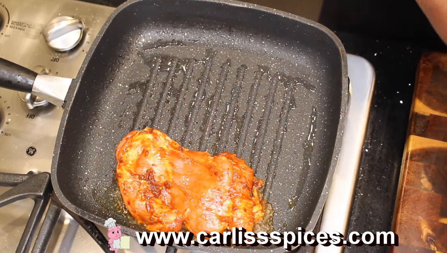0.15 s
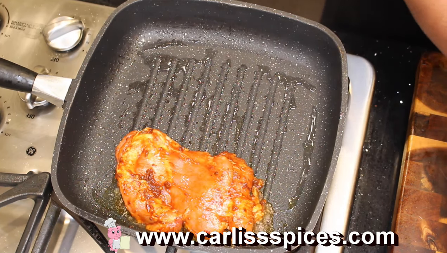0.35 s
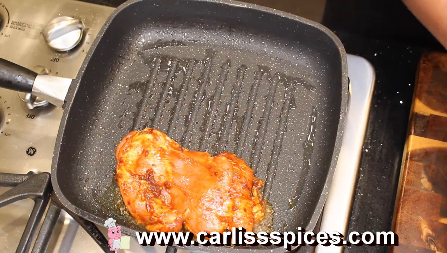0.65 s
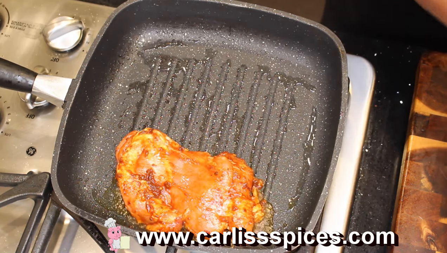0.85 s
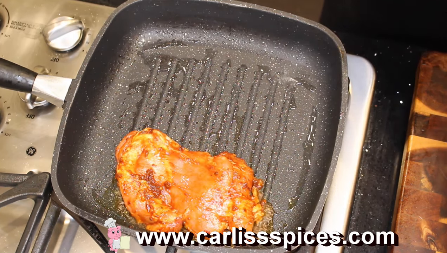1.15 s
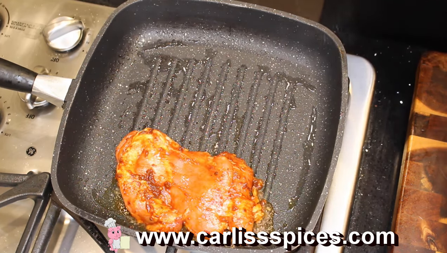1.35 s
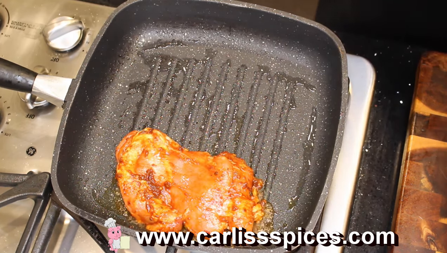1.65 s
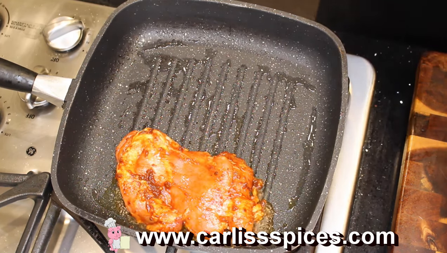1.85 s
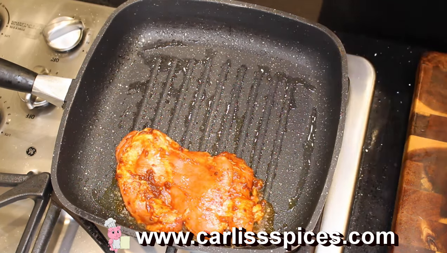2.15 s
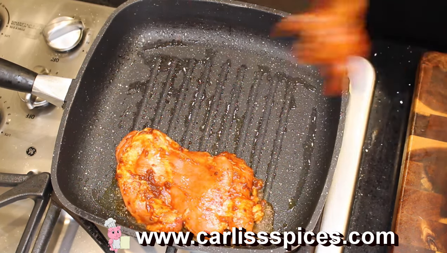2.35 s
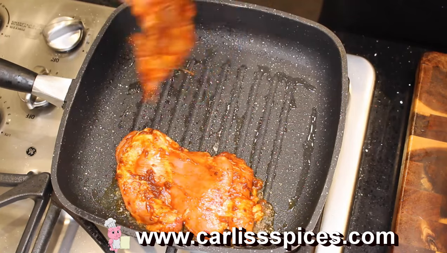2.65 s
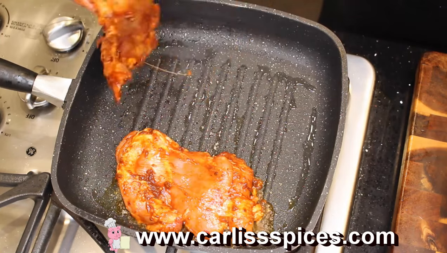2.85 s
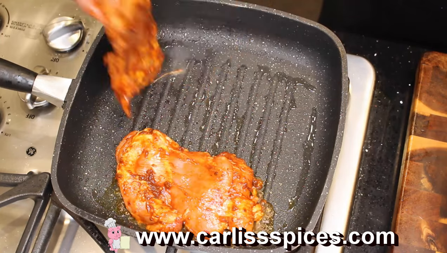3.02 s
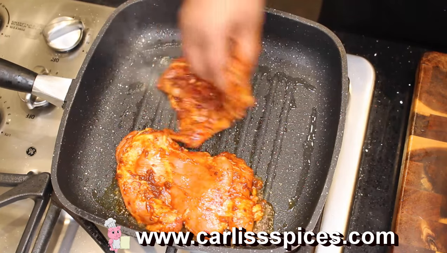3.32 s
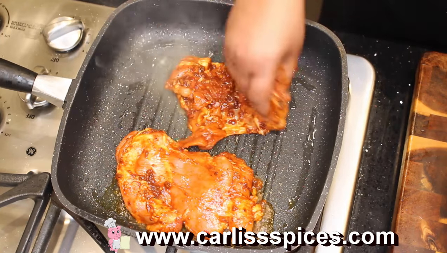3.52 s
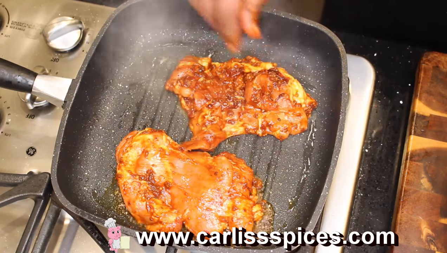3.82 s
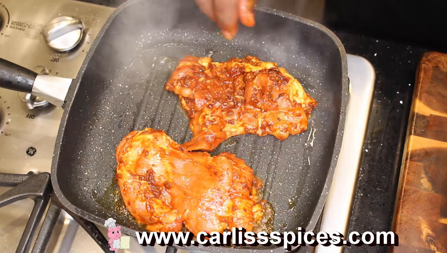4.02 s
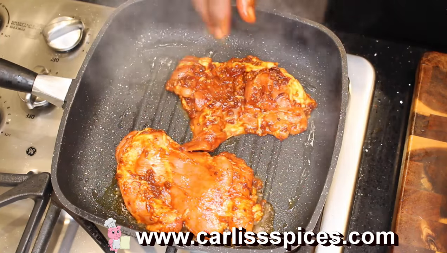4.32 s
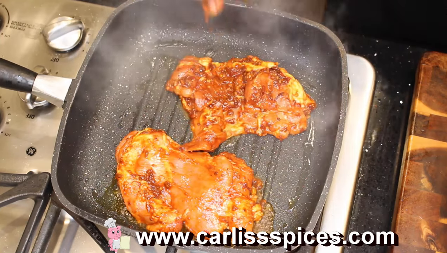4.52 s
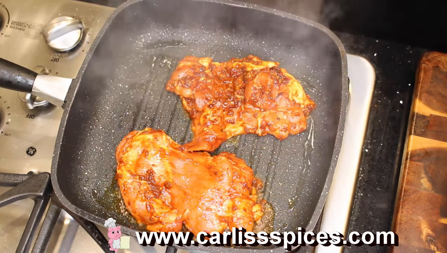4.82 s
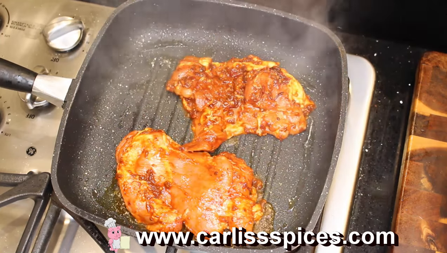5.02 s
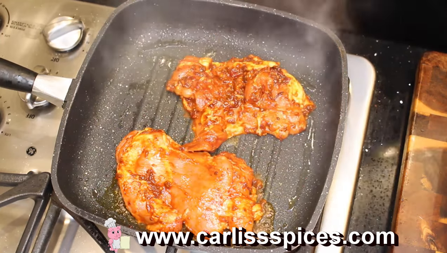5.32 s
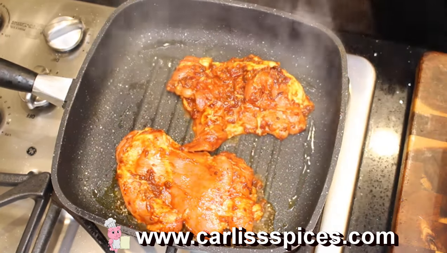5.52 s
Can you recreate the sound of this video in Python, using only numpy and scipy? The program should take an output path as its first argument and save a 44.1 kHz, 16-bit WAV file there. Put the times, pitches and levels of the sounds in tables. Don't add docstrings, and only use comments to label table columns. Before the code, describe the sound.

From 0 s a dense, steady sizzle fills the close stereo picture, already running: countless tiny bubbles crackling in hot fat, with a faint metallic ringing of the pan. Below it sit a soft low burner roar and deep room hum; a very faint low motor drone runs until about 1 s. Quiet dull knocks come in the first half second and around 1.6 to 2.3 s. Small sharp spits pop irregularly throughout; the biggest cracks and shatters at 1.17 s, followed by a tiny dip in loudness. More pops cluster from 1.6 to 3 s. At about 3.1 s a wet piece touches the pan: a broad steam hiss surges, strongest near 3.3 s, sinks in pitch and is gone by 3.85 s, with dull pan thumps. Then the frying is brighter and the roar lower. A faint drone returns from 4.55 s; a strong spit snaps at 5.3 s, and sizzling continues to 5.67 s.

```python
import sys
import numpy as np
from scipy import signal
from scipy.fft import rfft, irfft, next_fast_len
from scipy.io import wavfile
from scipy.ndimage import uniform_filter1d

SR = 44100
rng = np.random.default_rng(int(sys.argv[2]) if len(sys.argv) > 2 else 0)


def how_loud(loudness_db):
    steps = np.asarray(loudness_db, float) / 20
    return 10 ** steps


def store_pcm(level_fs):
    pcm = np.round(np.clip(level_fs, -1, 1) * 32767).astype(np.int16)
    wavfile.write(sys.argv[1], SR, np.atleast_2d(pcm).T)


N = 250037

# (time [s], share [0-1])
PIECE_SHARE = [
    (0, 0.07),
    (3.1, 0.25),
    (3.3, 1),
    (5.67, 1),
]


def in_time(rows):
    s, *columns = np.transpose(rows)
    return [np.interp(np.arange(N) / SR, s, column) for column in columns]


def at_hz(points, hz):
    points = np.array(points)
    return np.interp(np.log(hz + 1), np.log(points[:, 0]), points[:, 1])


def rms_one(x):
    return x / np.sqrt(np.mean(x ** 2) + 1e-20)


def drift(rate):
    r = np.exp(-80 * np.pi * rate / SR)
    noise = rng.standard_normal(N // 40 + 2002)
    slow = signal.lfilter([1], [1, -2 * r, r * r], noise)[2000:]
    return np.interp(np.arange(N) / 40, np.arange(len(slow)), rms_one(slow))


def low_part(x, hz, steepness):
    size = next_fast_len(N)
    bins_hz = np.arange(size // 2 + 1) * SR / size
    return irfft(rfft(x, size) / (1 + (bins_hz / hz) ** steepness), size)[:, :N]


def resonance(x, hz, width):
    r = np.exp(-np.pi * width / SR)
    poles = [1, -2 * r * np.cos(2 * np.pi * hz / SR), r * r]
    return signal.lfilter([(1 - r * r) / 2, 0, (r * r - 1) / 2], poles, x + 1e-18)


def lines(x, modes):
    out = 0
    for hz, width, db in modes:
        out = out + how_loud(db) * rms_one(resonance(resonance(x, hz, width), hz, width))
    return out


def coloured(mid_side, spectrum):
    # (frequency [Hz], likeness [0-1])
    likeness = [(60, 0.52), (130, 0.66), (290, 0.78), (640, 0.84), (1410, 0.88), (3100, 0.76), (6820, 0.66),
                (15000, 0.48)]
    # (frequency [Hz], difference [dB])
    left_lean = [(60, -2), (110, 6), (200, -2), (380, -5), (700, -2.0), (1290, -1), (2380, -1.5),
                 (4400, -1), (8120, -1.5), (15000, -1.5)]
    size = 2 * next_fast_len(N // 2 + 4096)
    hz = np.arange(size // 2 + 1) * SR / size
    cepstrum = irfft(np.log(how_loud(at_hz(spectrum, hz))), size)
    cepstrum[1:size // 2] *= 2
    cepstrum[size // 2 + 1:] = 0
    mid, side = rfft(mid_side, size) * np.exp(rfft(cepstrum))
    alike = np.clip(at_hz(likeness, hz), 0, 1)
    lean = how_loud(at_hz(left_lean, hz) / 2)
    mid, side = np.sqrt(1 + alike) * mid, np.sqrt(1 - alike) * side
    pair = irfft([(mid + side) * lean, (mid - side) / lean], size)[:, :N]
    return pair / np.sqrt(np.mean(pair.mean(axis=0) ** 2))


def echoed(x):
    # (delay [s], level [dB])
    surfaces = [(.0023, -20), (.0041, -19), (.0067, -20), (.0112, -20), (.0171, -21), (.0253, -21)]
    out = x.copy()
    for delay, db in surfaces:
        lag = round(delay * SR)
        out[:, lag:] += how_loud(db) * x[:, :-lag]
    return out


def bubble_train(per_s, spread_db):
    sizes = how_loud(spread_db * np.minimum(rng.exponential(1, (2, N)), 4)) * rng.choice([-1, 1], (2, N))
    return rms_one(sizes * (rng.random((2, N)) < per_s / SR))


def bursts(per_s, spread_db, crack_per_s, crack_db, patchy_db):
    top_patchy_db, top_hz = 2, 14000
    edges = np.append(300 * 2 ** np.arange(0, 5.9, .5), 19000)
    surge = drift(26)
    trains = [bubble_train(per_s, spread_db), bubble_train(per_s, spread_db)]
    cracks = how_loud(crack_db) * bubble_train(crack_per_s, spread_db)
    out = 0
    for k, (low, high) in enumerate(zip(edges, edges[1:])):
        half_octave = signal.butter(2, [low, high], "band", fs=SR, output="sos")
        band = signal.sosfilt(half_octave, trains[k % 2] + cracks)
        swell_db = patchy_db * (0.33 * surge + 0.5 * drift(15))
        swell_db = swell_db + top_patchy_db * (high > top_hz) * drift(20.)
        out = out + band * how_loud(swell_db)
    return out


def levelled(x):
    return x / np.sqrt(uniform_filter1d(x.mean(axis=0) ** 2, size=SR))


def sizzle(dull_db, bright_db):
    # (frequency [Hz], density [dB per Hz])
    one_piece = [(400, -36.5), (535, -23.5), (570, -8.5), (850, -9), (1250, -9.5), (1480, -4), (2250, -.5),
                 (2650, -5), (3050, 0), (3800, -4.5), (4700, 0), (8500, -3), (12000, -10), (15600, -19)]
    # (frequency [Hz], density [dB per Hz])
    two_pieces = [(400, -27.5), (535, -26.5), (570, -11), (1000, -9), (1250, -12), (1450, -6.5),
                  (2300, -1.5), (2680, -7.5), (3400, -2), (4100, -5), (5200, -2), (8500, -4), (12000, -9.5),
                  (15600, -15)]
    # (frequency [Hz], width [Hz], level [dB])
    pan_modes = [(582, 18, -49), (606, 20, -55), (752, 25, -54), (897, 25, -50), (1127, 25, -54),
                 (1201, 25, -58), (1286, 25, -56), (1350, 25, -59), (2214, 110, -51), (3371, 70, -43),
                 (3520, 90, -45), (4360, 50, -48)]
    fizz = echoed(bursts(per_s=5000., spread_db=2.0, crack_per_s=320.0, crack_db=-15.0, patchy_db=.5))
    share = np.clip(in_time(PIECE_SHARE)[0], 0, 1)
    pan = (1 - share) * coloured(fizz, one_piece) + share * coloured(fizz, two_pieces)
    dull = low_part(pan, hz=4500, steepness=8)
    ringing = how_loud(22.0) * lines(fizz[0], pan_modes) * how_loud([[-.7], [.7]])
    return how_loud(dull_db) * (levelled(dull) + ringing) + how_loud(bright_db) * levelled(pan - dull)


def kitchen():
    # (time [s], level [dB])
    roar = [
        (0, -46),
        (1.05, -46),
        (1.25, -46.5),
        (3.0, -46),
        (3.4, -52.5),
        (3.9, -50.5),
        (4.25, -49.5),
        (5.2, -51),
        (5.67, -49),
    ]
    # (frequency [Hz], density [dB per Hz])
    burner = [(82, -43.5), (140, 0.5), (188, -3), (242, 2), (312, -2.5), (350, 0), (393, -1), (520, -6),
              (680, -29), (1140, -120)]
    # (frequency [Hz], width [Hz], level re roar [dB])
    hum = [(242.5, 11, -12), (266.4, 18, -14), (356.6, 5.1, -21), (466, 24, -9)]
    # (frequency [Hz], density [dB per Hz])
    deep = [(15, -40), (25, -15), (49, -5), (75, -7), (102, -5), (135, -1), (180, -28), (300, -120)]
    # (frequency [Hz], width [Hz], level re deep hum [dB])
    deep_hum = [(59.6, 4.1, -6)]
    # (time [s], frequency [Hz], level [dB], t60 [s])
    knocks = [(0.13, 540, -35.5, 0.6), (0.269, 273.4, -38.5, 0.68), (0.449, 102, -52, 1.2),
              (1.6, 900, -29, 0.22), (1.735, 347, -29, .2), (1.96, 352, -34, .12), (2.32, 106, -43, 0.18),
              (4.28, 100, -50, .15), (3.27, 605, -30, 0.17), (3.43, 606, -33, 0.87),
              (3.69, 605, -29.5, .25)]
    flutters_per_s = 6.5
    roar_db, = in_time(roar)
    deep_db = -57 + 1.5 * (roar_db - roar_db.mean()) + 2.5 * drift(flutters_per_s)
    roar_db = roar_db + 1.5 * drift(flutters_per_s)
    air = rng.standard_normal((2, N))
    out = how_loud(roar_db - 0.9) * (coloured(air, burner) + lines(air[0], hum))
    out = out + how_loud(deep_db - 3.0) * (coloured(air[::-1], deep) + lines(air[0], deep_hum))
    for s, hz, db, t60 in knocks:
        t = np.maximum(np.arange(N) / SR - s, 0)
        envelope = how_loud(db - 60 * t / t60) * (1 - np.exp(-t / 0.0039))
        out = out + envelope * np.sin(2 * np.pi * hz * t)
    return out


def drone():
    # (start [s], length [s], level [dB])
    runs = [
        (.08, 0.99, -55.5),
        (4.55, .25, -62),
        (4.847, .3, -57),
    ]
    hz, fade_s, waver_db = 102, 0.045, 4
    t = np.arange(N) / SR
    on = 0
    for s, length, db in runs:
        on = on + how_loud(db) * np.clip(np.minimum(t - s, s + length - t) / fade_s, 0, 1)
    tone = np.sin(2 * np.pi * (hz * t + .2 * drift(3.)))
    return on * how_loud(waver_db * drift(5.)) * tone * how_loud([[2], [4]])


def drops():
    # (time [s], dull part peak [dB], bright part peak [dB])
    large = [(.1073, -14, -8), (.3773, -13, -15), (.893, -14, -11), (1.17, -13, -14), (1.1743, -8, -3),
             (1.1887, -14, -7), (1.1941, -12, -19), (1.615, -13, -9), (1.6331, -9, -11), (1.6615, -18, -7),
             (1.8033, -23, -8), (1.9613, -16, -9), (2.1444, -17, -9), (2.3261, -13, -10),
             (2.3844, -12, -10), (2.3914, -17, -8), (2.5419, -17, -8), (2.6513, -12, -10),
             (2.8924, -11, -11), (2.902, -17, -6), (2.9913, -11, -10), (3.2098, -10, -4), (3.2586, -22, -8),
             (3.3404, -14, -9), (3.4891, -16, -8), (3.5021, -13, -10), (4.2344, -17, -6), (4.8459, -16, -9),
             (5.108, -15, -9), (5.3198, -8, -5)]
    small_per_s, small_db, spread_db = 12, [-20, -12], 2.5
    draw = rng.standard_normal((round(small_per_s * N / SR), 2))
    small_s = rng.uniform(0, N / SR, len(draw)) + 1e-4
    small = np.column_stack([small_s, small_db + spread_db * np.clip(draw, -2, 1)])
    s, dull_db, bright_db = np.vstack([large, small]).T
    pan_db = -0.5 + 3 * rng.standard_normal(len(s))
    return s, dull_db, bright_db, pan_db


def splat_spray(decay):
    spray = rng.standard_normal((2, 400))
    spray = spray[0] + 0.43 * spray[1] * np.array([[1], [-1]])
    low, middle = resonance(spray, 1840, 800.), resonance(spray, 4700, 1900.0)
    high = resonance(spray, 9600, 2000.)
    return (1.75 * low - 1.05 * middle + 1.1 * high) * np.exp(-np.arange(400) / SR / decay)


def pops():
    # (time [s], peak [dB], decay [s])
    splat = (1.1741, 5.5, .0008)
    s, dull_db, bright_db, pan_db = drops()
    draw = rng.random((len(s), 4))
    out, t = np.zeros((2, N + 400)), np.arange(400) / SR
    sizes = zip(how_loud(dull_db - 1), how_loud(bright_db))
    for at, (dull, bright), pan, (a, b, c, d) in zip(s, sizes, pan_db, draw):
        low_hz, high_hz = 1800 + 1800 * a, 6000 + 3500 * b
        pop = -dull * np.sin(2 * np.pi * low_hz * t) * np.exp(-t / .00055)
        pop = pop - 1.5 * bright * np.sin(2 * np.pi * high_hz * t) * np.exp(-t / .00017)
        lags = np.round((0.00043 + .0004 * np.array([c, d])) * SR).astype(int)
        start = max(round(at * SR) - 3, 0)
        for side, lag in enumerate(lags):
            heard = pop + 0.73 * np.roll(pop, lag) + 0.18 * np.roll(pop, 2 * lag + 9)
            out[side, start:start + 400] += heard * how_loud(pan * (0.5 - side))
    at, peak_db, decay = splat
    start = round(at * SR)
    out[:, start:start + 400] += how_loud(peak_db) * splat_spray(decay)
    no_bass = signal.butter(4, 1200, "high", fs=SR, output="sos")
    return signal.sosfilt(no_bass, echoed(out[:, :N]))


def steam():
    # (time [s], level [dB], centre [Hz])
    rush = [
        (3.1, -50, 5000),
        (3.18, -40, 5000),
        (3.21, -31, 5000),
        (3.33, -26, 4500),
        (3.5, -34.5, 4170),
        (3.62, -40, 4270),
        (3.67, -38, 3500),
        (3.78, -38, 3500),
        (3.85, -52, 3500),
    ]
    # (frequency [Hz], width [Hz], level re hiss [dB])
    pan_ring = (3400, 130, -17)
    level_db, hz = in_time(rush)
    air = rng.standard_normal((2, N))
    jet = 0
    for centre in np.geomspace(3500, 7000, 5):
        nearness = np.exp(-(np.log(hz / centre) / 0.22) ** 2)
        jet = jet + resonance(air, centre, 1100.0) * nearness
    jet = jet + .5 * resonance(air, 8100, 1500.)
    jet = jet + lines(air, [pan_ring])
    t = np.arange(N) / SR
    live = (t > rush[0][0]) * (t < rush[-1][0])
    return how_loud(level_db + 13.0) * (jet[0] + 0.38 * jet[1] * np.array([[1], [-1]])) * live


def scene():
    # (time [s], level [dB])
    vigour = [(0.0, -21), (0.2, -21.5), (0.62, -20.5), (1.05, -21), (1.17, -21), (1.4, -22), (1.6, -21),
              (2.03, -22.5), (2.3, -20.5), (2.47, -21.5), (3.15, -20.5), (3.35, -21.5), (4.1, -20.5),
              (4.4, -21.5), (5.1, -20.5), (5.22, -22), (5.5, -22.5), (5.67, -22)]
    # (time [s], change [dB])
    flares = [(.1, -0.5), (1.175, 2), (1.62, 1.2), (2.34, 0.5), (2.9, 0.2), (3.21, 2.5), (3.635, -1.5),
              (4.2, 0), (4.86, 0.5), (5.31, 2), (5.5, 1.5)]
    flare_s = 0.017
    waver_db, wavers_per_s = 0.45, 3
    (vigour_db,), (both,) = in_time(vigour), in_time(PIECE_SHARE)
    t = np.arange(N) / SR
    for s, db in flares:
        vigour_db = vigour_db + db * np.exp(-((t - s) / flare_s) ** 2)
    dull_db = vigour_db - 3 - 1.07 * both + waver_db * drift(wavers_per_s)
    bright_db = vigour_db - 4 + 1.2 * both + waver_db * drift(wavers_per_s)
    return sizzle(dull_db, bright_db) + kitchen() + drone() + pops() + steam()


def bass_cuts(x):
    # (time [s], depth [dB], half length [s])
    cuts = [
        (1.21, -14, .018),
        (3.26, -6, .012),
        (3.475, -19, 0.018),
        (3.53, -12, 0.011),
        (4.618, -6, 0.013),
        (5.62, -8, 0.013),
    ]
    t = np.arange(N) / SR
    cut_db = sum(db * np.exp(-((t - s) / half) ** 2) for s, db, half in cuts)
    return x + (how_loud(cut_db) - 1) * low_part(x, hz=500, steepness=12)


def band_limit(x):
    return signal.sosfilt(signal.butter(12, 15760, fs=SR, output="sos"), x)


def record(dry):
    threshold_db, duck_share, recovery_db_per_s = -8, .33, 165.
    wait_s, lag_s = .014, .006
    over_db = np.maximum(20 * np.log10(np.abs(dry).max(axis=0) + 1e-9) - threshold_db, 0)
    ramp = recovery_db_per_s * np.arange(N) / SR
    held_db = np.maximum.accumulate(over_db + ramp) - ramp
    r = np.exp(-1 / (lag_s * SR))
    duck_db = signal.lfilter([(1 - r) ** 2], [1, -2 * r, r * r], np.roll(held_db, round(wait_s * SR)))
    mix = np.clip(bass_cuts(dry) * how_loud(-duck_share * duck_db), -1, 1)
    return band_limit(mix)


dry = scene()
out = record(dry)
store_pcm(out)
```